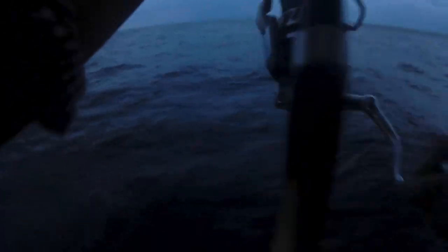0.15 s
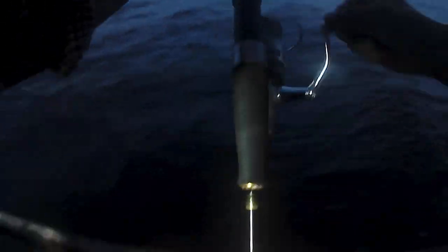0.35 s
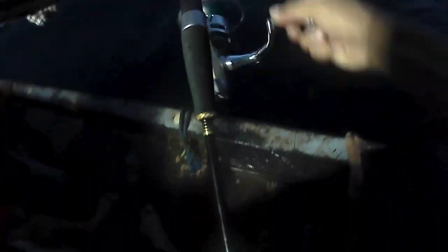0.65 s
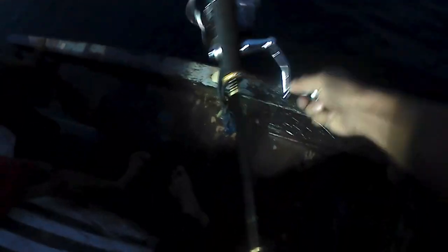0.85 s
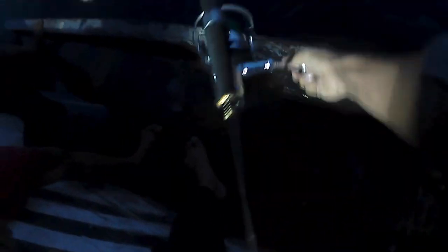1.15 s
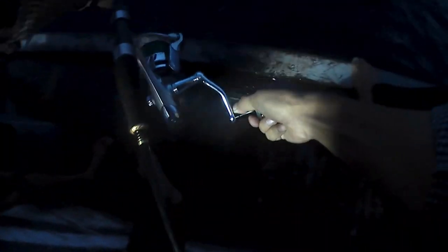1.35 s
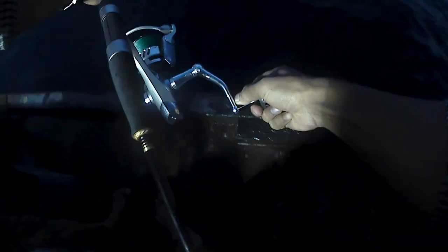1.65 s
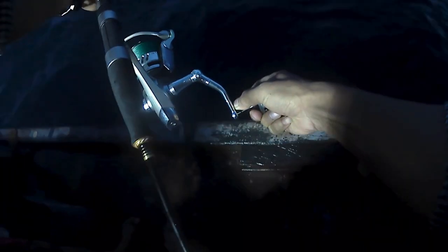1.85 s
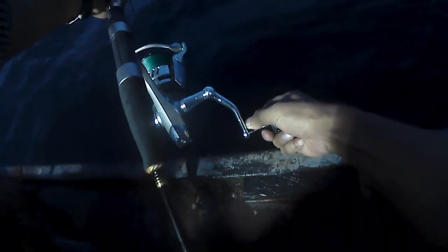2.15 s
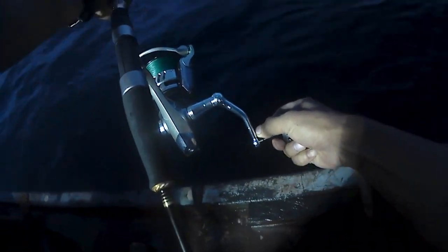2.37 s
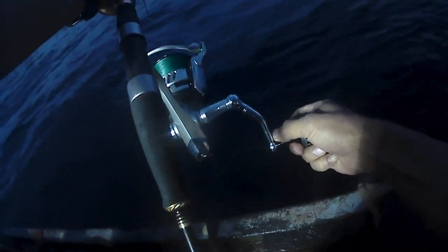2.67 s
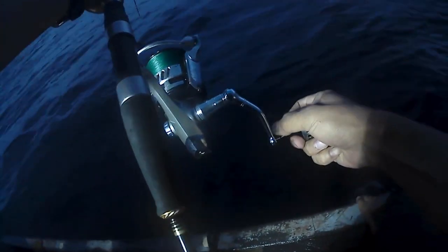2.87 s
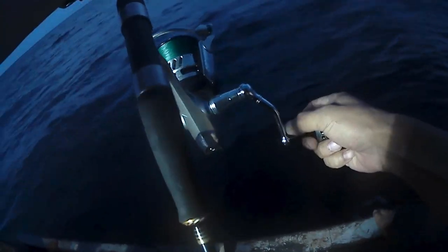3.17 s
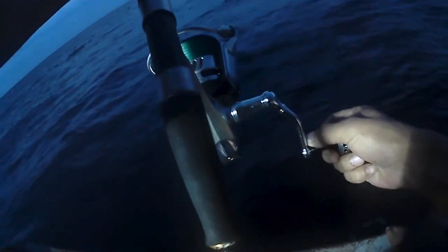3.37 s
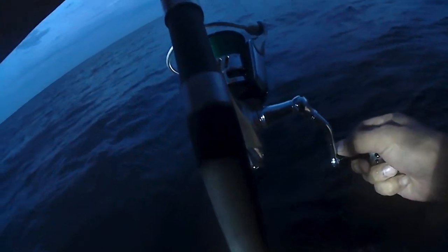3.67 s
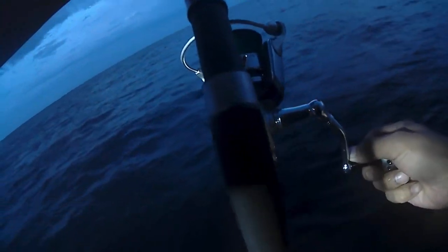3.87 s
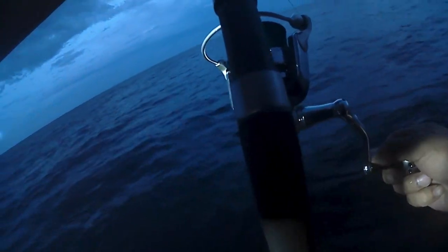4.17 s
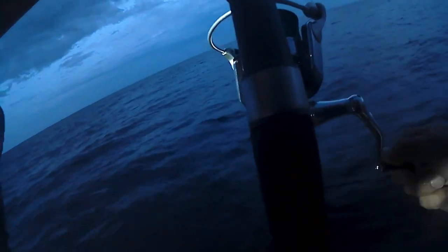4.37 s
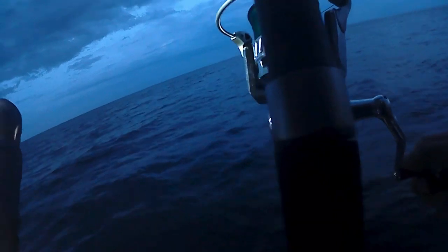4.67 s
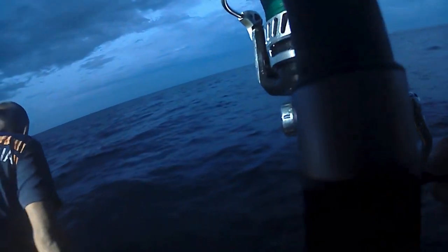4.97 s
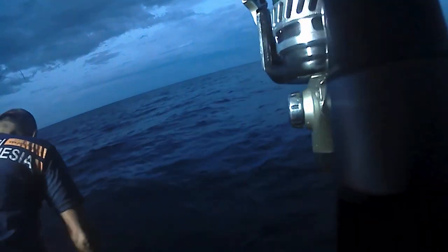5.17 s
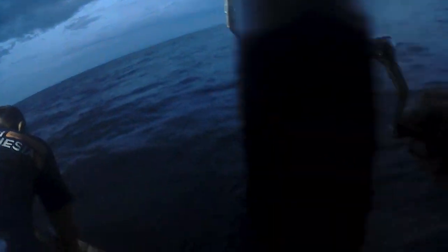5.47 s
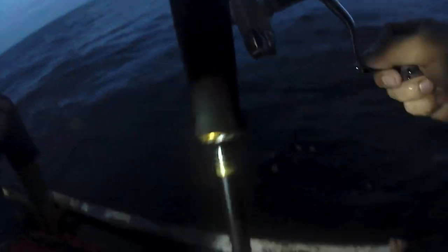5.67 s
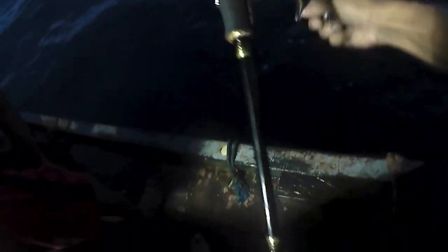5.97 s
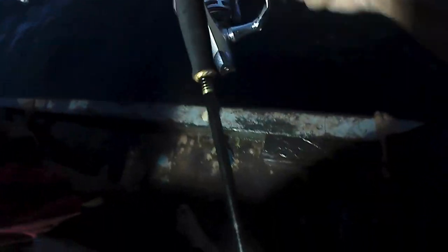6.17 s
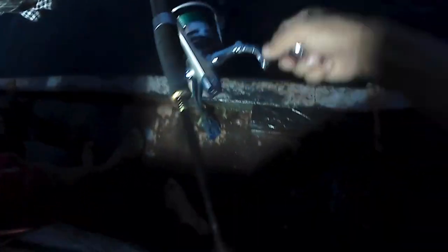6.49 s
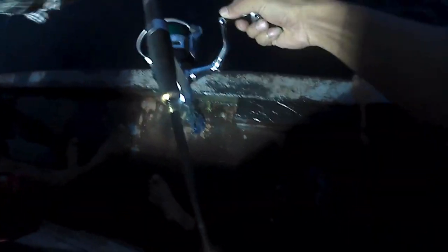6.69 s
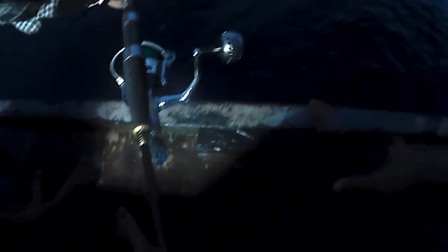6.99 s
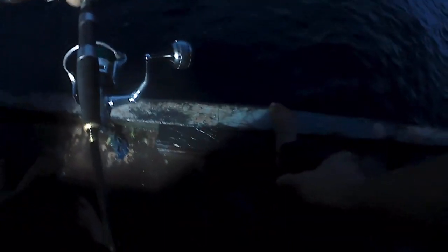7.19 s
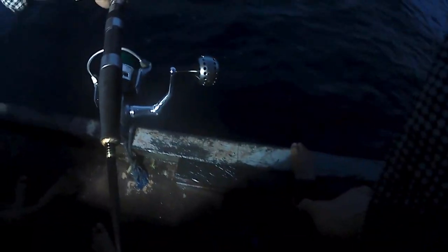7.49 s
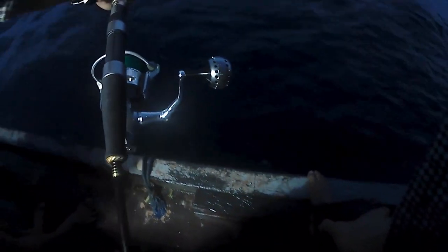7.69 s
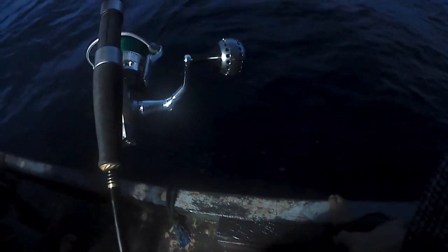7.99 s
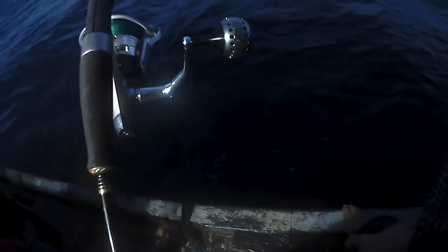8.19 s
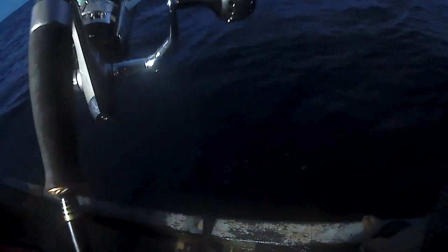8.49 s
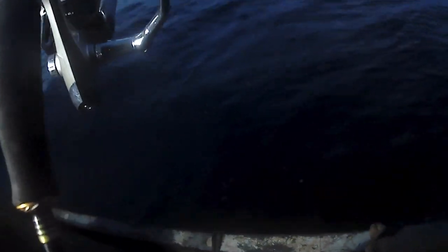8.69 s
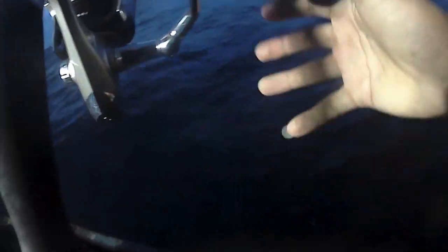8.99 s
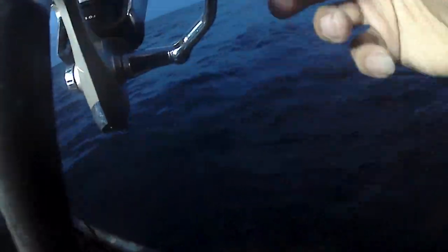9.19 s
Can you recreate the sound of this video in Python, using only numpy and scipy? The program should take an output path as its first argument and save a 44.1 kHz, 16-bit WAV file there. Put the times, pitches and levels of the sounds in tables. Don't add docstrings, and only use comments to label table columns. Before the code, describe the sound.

Muffled handling noise inside a sealed camera: cloth rubs, hard ticks and knocks, faint reel whir, low throbs, dull sea wash behind.

```python
import sys
import numpy as np
from scipy import signal
from scipy.io import wavfile
from scipy.ndimage import uniform_filter1d, minimum_filter1d

SR = 44100
rng = np.random.default_rng(int(sys.argv[2]) if len(sys.argv) > 2 else 0)


def linear_from_db(decibels):
    return 10 ** (np.asarray(decibels, float) / 20)


def wav_out(sig):
    wavfile.write(sys.argv[1], SR, np.round(np.clip(np.atleast_2d(sig).T, -1, 1) * 32767).astype(np.int16))


N = 411894
TIME = np.arange(N) / SR


def unit(x):
    return x / np.sqrt(np.mean(x ** 2))


def band(x, hz, width_hz):
    return signal.lfilter(*signal.iirpeak(hz, hz / width_hz, SR), x)


def steep_band(x, hz, width_hz):
    return band(band(x, hz, width_hz), hz, width_hz)


def ring(x, modes, sense=-1):
    return sum(sense ** k * linear_from_db(db) * band(x, hz, width_hz) for k, (hz, width_hz, db) in enumerate(modes))


def walk(rate_hz):
    hold = int(SR / rate_hz)
    steps = np.repeat(rng.standard_normal(N // hold + 1), hold)
    slewed = uniform_filter1d(uniform_filter1d(steps, hold), hold)
    return unit(slewed[:N])


def grit(rate_hz, spread_db):
    hit = rng.random(N) < rate_hz / SR
    size = rng.exponential(size=N)
    return unit(hit * rng.standard_normal(N) * linear_from_db(spread_db * size))


def around(s, reach_s):
    near = slice(max(int((s - reach_s) * SR), 0), int((s + reach_s) * SR))
    return near, TIME[near] - s


def strike(s, levels_db, response):
    push = np.zeros(N)
    push[(s * SR).astype(int)] = -linear_from_db(levels_db)
    return signal.oaconvolve(push, response / np.abs(response).max())[:N]


def curve(table):
    return np.interp(TIME, *np.transpose(table))


# frequency in Hz, density in dB per Hz.
SEA_SPECTRUM = [(18, -31), (30, 3.5), (65, -64), (106, -16), (138, -31), (173, -31.5), (353, -35.5),
                (390, -35), (489, -48.5), (530, -35), (611, -43.5), (882, -43), (3900, -53), (5070, -87),
                (8580, -120)]


def sea():
    level_db = -62
    hz_points, db_points = np.transpose(SEA_SPECTRUM)
    out, power_above = 0, 0
    swell_db = .7 * walk(1.2)
    for hz in 32 * 2 ** (np.arange(21) / 3):
        db = np.interp(np.log(hz), np.log(hz_points), db_points) + 10 * np.log10(hz)
        noise = unit(steep_band(rng.standard_normal(N), hz, hz / 3))
        out = out + linear_from_db(db + swell_db + 2.14 * walk(10)) * noise
        power_above = power_above + (hz > 340) * linear_from_db(db) ** 2
    return out * linear_from_db(level_db) / np.sqrt(power_above)


# time in seconds, rub level in dB.
CLOTH_PRESS = [(0, -60.5), (.2, -44.5), (.52, -56), (.68, -51), (1.15, -54), (1.35, -67), (2.05, -70.5),
               (2.35, -63), (4.3, -62), (5.2, -66), (5.6, -52.5), (5.9, -55), (6.35, -53.5), (6.66, -61.5),
               (6.95, -50.5), (7.7, -64), (8.25, -54.5), (9.34, -69)]
# centre in seconds, rms in dB,
# length in seconds.
STROKES = [(0.136, -44, 0.027), (0.29, -50, 0.069), (4.627, -44, 0.05), (4.718, -43, 0.088),
           (4.811, -43, 0.045), (4.888, -52, 0.049), (4.962, -50.5, 0.051), (5.034, -43.5, 0.039),
           (5.086, -48.5, 0.04), (5.173, -52.5, 0.03), (7.098, -52, 0.019), (7.173, -52, 0.037),
           (7.319, -46, 0.012), (7.503, -53.5, 0.047), (7.675, -51.5, 0.17), (8.099, -55, 0.023),
           (8.197, -56, 0.077), (8.396, -48.5, 0.022), (8.491, -49.5, 0.055), (8.562, -48, 0.076),
           (8.635, -48.5, 0.049), (9.101, -48.5, 0.031),
           (0.645, -51, 0.062), (0.792, -48.5, 0.08), (0.935, -47.5, 0.093), (1.098, -50, 0.046),
         (1.177, -53, .05), (3.488, -65.5, 0.29), (3.925, -57.5, .07), (4.115, -55.5, 0.1),
         (4.226, -52.5, .05), (4.335, -58.5, 0.092), (4.532, -56.5, 0.1), (5.675, -52.5, 0.11),
         (5.806, -53, 0.14), (6.084, -58.5, 0.29), (6.288, -49.5, 0.085), (6.445, -55, 0.082),
         (6.889, -49, 0.098), (7.03, -49, 0.13), (7.956, -60, 0.2), (8.134, -54.5, 0.15),
         (8.77, -54.5, 0.096)]
# frequency in Hz, width in Hz, level in dB.
SHELL_MODES = [(1175, 111, -3), (1383, 218, -1), (1474, 130, 2), (1602, 142, -3.5), (1846, 111, -3),
               (2405, 520, -14.5), (2637, 320, -15), (630, 100, -4.5)]
# frequency in Hz, width in Hz, level in dB.
BODY_MODES = [(203.3, 71, -3.5), (249, 34.4, 0.5), (301, 31.3, -1.5), (506, 302, -11), (631.5, 184, -8)]
# frequency in Hz, width in Hz, level in dB.
SHEEN_MODES = [(1850, 390, -6), (2756, 190, -4)]


def rub():
    quick_s = 0.062
    strokes, quick = np.zeros((2, N))
    for s, db, length_s in STROKES:
        near, u = around(s, .15)
        shape = linear_from_db(db) * np.exp(-np.abs(u / (0.45 * length_s)) ** 2.8)
        strokes[near] += shape
        quick[near] += shape / (1 + (length_s / quick_s) ** 2)
    fibres = grit(4000, spread_db=1.0)
    drag = np.hypot(linear_from_db(curve(CLOTH_PRESS) + 0.64 * walk(30)), strokes) * fibres
    wandering = [(hz, width_hz, db + 1.6 * walk(15)) for hz, width_hz, db in SHELL_MODES]
    shell, body = ring(drag, wandering), ring(drag, BODY_MODES)
    sheen = ring(quick * fibres, SHEEN_MODES)
    return linear_from_db(19.5) * shell + linear_from_db(19.5) * body + linear_from_db(11.5) * sheen


# first in seconds, end in seconds, period in seconds.
THROB_SPELLS = [
    (1.448, 5.9, .3654),
    (6.54, 8.8, .364),
]


def beats():
    return np.concatenate([np.arange(*spell) for spell in THROB_SPELLS])


# time in seconds, level in dB.
SHAKE = [(0, -45), (.15, -40.5), (.35, -41.5), (1.17, -42), (1.4, -56.5), (2.1, -60), (3.5, -50),
         (3.75, -58.5), (4.2, -45.5), (5.2, -47), (6.5, -47), (6.8, -43), (7.02, -35), (7.3, -48),
         (7.7, -47), (8.1, -48), (8.6, -42), (9.34, -60)]
# frequency in Hz, width in Hz, level in dB.
DEEP_MODES = [(55, 32.1, 0), (93.2, 44.5, 0.016)]


def buffet():
    body_db, low_db, deep_db = -7, -14.5, -2.5
    low_share, throb_shake_db = 0.43, 1
    shake_db, sway_db = curve(SHAKE), curve(SWAY)
    for s in beats():
        near, u = around(s, .2)
        shake_db[near] += throb_shake_db * np.exp(-(u / 0.2) ** 2)
    lumps = grit(700, spread_db=1.0) * linear_from_db(2.6 * walk(24))
    low, deep = (unit(ring(band(lumps, 70., 90.), [mode])) for mode in DEEP_MODES)
    body = linear_from_db(shake_db + body_db) * unit(ring(lumps, BODY_MODES))
    low = linear_from_db(low_db + shake_db + low_share * (sway_db - shake_db)) * low
    return body + low - linear_from_db(shake_db + deep_db) * deep


# time in seconds, level in dB.
SWAY = [(0.0, -63), (0.1, -26.5), (0.7, -16), (0.75, -26.5), (1.2, -20.5), (1.3, -36), (3.35, -39.5),
        (6.81, -23), (6.87, -34), (7.08, -26), (8.19, -41.5), (8.35, -30.5), (8.95, -32.5), (9.05, -61),
        (9.21, -22.5), (9.34, -42)]
# time in seconds, peak in dB.
THROB_LEVEL = [(1.4, -34.5), (2.9, -29), (3.63, -22), (4.37, -25), (5.46, -19.5), (5.83, -26), (6.9, -35),
               (7.63, -25), (8.36, -29), (8.73, -40)]
# time in seconds, peak in dB, frequency in Hz.
JOLTS = [
    (.145, -22, 24.3),
    (1.037, -24, 27),
    (1.277, -37, 22),
    (9.116, -21, 33.2),
]


def mount():
    throb_hz, octave_db = 22.15, -10
    slow = band(rng.standard_normal(N), 8.4, 8.1)
    slow = band(band(slow, 9.6, 12.3), 10.04, 13.0)
    sway = unit(slow) * linear_from_db(curve(SWAY))
    throbs = [(s, np.interp(s, *np.transpose(THROB_LEVEL)), throb_hz) for s in beats()]
    for s, db, hz in throbs + JOLTS:
        near, u = around(s, .25)
        swing = np.exp(-(u / np.where(u < 0, .03, .055)) ** 2)
        sway[near] += linear_from_db(db) * swing * np.sin(2 * np.pi * hz * u)
        sway[near] += linear_from_db(db + octave_db) * np.exp(-(u / 0.022) ** 2) * np.sin(2 * np.pi * 2 * hz * u)
    return sway


# centre in seconds, whir in dB, length in seconds.
CRANKS = [
    (0.24, -64.5, 0.38),
    (0.643, -61, 0.37),
    (0.924, -53.5, 0.091),
    (1.093, -59.5, 0.091),
    (5.732, -62.5, .35),
    (6.134, -57.5, 0.28),
    (6.459, -64, 0.12),
    (8.693, -79.5, 0.086),
]


def cranking():
    idle_db = -77
    turns = sum(linear_from_db(db) * np.exp(-((TIME - s) / (.5 * length_s)) ** 2) for s, db, length_s in CRANKS)
    return 20 * np.log10(linear_from_db(idle_db) + turns)


# frequency in Hz, width in Hz, level in dB.
REEL_MODES = [(2120, 430, 0), (2990, 80, -5), (3600, 200, -4.5), (3790, 150, -7)]


def reel():
    flutter_db = 3.5
    teeth = grit(2000, spread_db=-3.5)
    whir = 0
    for hz, width_hz, db in REEL_MODES:
        whir = whir + linear_from_db(db + flutter_db * walk(40)) * unit(steep_band(teeth, hz, 2 * width_hz))
    return linear_from_db(cranking() - 3.0) * whir


# time in seconds, tick peak in dB, deep thud in dB above the tick.
TICKS = [(0.0787, -39, -4), (0.1196, -33, 8), (0.173, -31.5, 8), (0.2238, -23, -2), (0.2595, -25.5, -2),
         (0.2904, -35.5, 4), (.4832, -40, 6.5), (0.622, -32, 6), (0.946, -35, 0.5), (2.5587, -44, -20),
         (3.9956, -44.5, -5), (4.7265, -34.5, -6), (5.8112, -44, 3), (6.437, -38, -17), (6.861, -37.5, 1.5),
         (6.9412, -32.5, 1.5), (7.0528, -39, -2), (7.5398, -42.5, 0), (8.302, -40.5, -2),
         (8.4323, -35, -17), (8.495, -27.5, -10.5), (8.534, -35.5, -13), (8.6333, -37.5, 2),
         (8.6644, -37.5, -12), (8.684, -34, -10), (8.8205, -36, -26), (8.86, -24, -4.5), (9.0117, -41, -13),
         (9.102, -28, 0), (9.206, -48, -2)]
# time in seconds, knock in dB, deep thud in dB above the knock.
BUMPS = [(0.174, -35.5, -14), (0.3412, -38, -11), (0.484, -36.5, -16), (0.578, -34, -6), (0.631, -37, -21),
         (0.87, -34, -3.5), (1.06, -40.5, -4), (1.1638, -39.5, 2), (1.2895, -40.5, 0.5), (2.359, -46.5, -7),
         (3.7713, -47, -6), (3.808, -47, 0), (4.0414, -48, 11), (4.729, -41, -15), (5.4665, -41.5, 6),
         (5.6066, -43.5, -3), (6.0436, -42.5, 7.5), (6.0889, -41.5, 6), (6.3001, -35.5, -16),
         (6.44, -43, -5), (6.5337, -47, -6), (6.638, -38, -19), (6.863, -37.5, -6), (7.06, -37, 9),
         (7.4935, -45, 5), (7.7107, -41.5, -13), (8.3842, -36, 0), (8.5657, -40.5, -2), (8.635, -45, -7),
         (8.665, -37, -9)]
# time in seconds, knock in dB.
BLOWS = [
    (0.6262, -24.5),
    (1.056, -35),
    (1.2893, -41),
    (5.025, -40),
    (7.0558, -29.5),
    (8.497, -53),
    (8.861, -56.5),
    (9.104, -46.5),
]


def taps():
    tick_knock_db, bump_tick_db = -14.5, -22.5
    edge_s = .0002
    tick_s, hard_db, hard_thud_db = np.transpose(TICKS)
    bump_s, soft_db, soft_thud_db = np.transpose(BUMPS)
    blow_s, blow_db = np.transpose(BLOWS)
    s = np.r_[tick_s, bump_s]
    u = TIME[:4000]
    click = np.exp(-((u - .0014) / 0.0011) ** 2) * np.sin(2 * np.pi * 1466.0 * u)
    tick = click + linear_from_db(-7.0) * ring(click, SHELL_MODES)
    rap = np.exp(-((u - .003) / 0.00065) ** 2)
    push = np.exp(-((u - .0025) / 0.0012) ** 2)
    knock = ring(band(rap, 280., 350.), BODY_MODES, sense=1)
    thud = ring(push, DEEP_MODES, sense=1)
    bump = np.convolve(knock, np.exp(-u[:1500] / 0.013) * rng.standard_normal(1500))
    edge = np.exp(-((u - .0015) / edge_s) ** 2)
    knock = knock + linear_from_db(-8.0) * band(edge, 640.0, 810.0)
    out = strike(s, np.r_[hard_db, soft_db + bump_tick_db] + 1.5, tick)
    out += strike(tick_s, hard_db + tick_knock_db + 7.0, knock)
    out += strike(bump_s, soft_db + 6.0, bump)
    out += strike(blow_s, blow_db + 4.5, knock)
    out += strike(s, np.r_[hard_db + hard_thud_db, soft_db + soft_thud_db] + 7.5, thud)
    return out


# centre in seconds, rms in dB, length in seconds, frequency in Hz.
GROANS = [
    (1.067, -42.5, 0.046, 285),
    (4.75, -46.5, 0.17, 266),
    (5.799, -48.5, .08, 286),
    (6.3, -47, 0.091, 210),
    (7.7, -49.5, 0.11, 312),
    (8.399, -45.5, .06, 302),
    (8.802, -49, 0.15, 310),
]


def groans():
    out, noise = np.zeros(N), rng.standard_normal(20000)
    for s, db, length_s, hz in GROANS:
        near, u = around(s, .2)
        moan = unit(steep_band(noise, hz, 40.))[:len(u)]
        out[near] += linear_from_db(db) * np.exp(-(u / (.5 * length_s)) ** 2) * moan
    return out


def scene():
    return (sea() + rub() + buffet() + mount() + reel() + taps() + groans())[None]


SAMPLE_HZ = 8000


def starve(samples, margin_db=17.5, spread_db=4., top_db=-2.5):
    hz, _, cells = signal.stft(samples, SAMPLE_HZ, nperseg=256, noverlap=192)
    power = uniform_filter1d(np.abs(cells) ** 2, size=5, axis=0)
    db = 10 * np.log10(uniform_filter1d(power, size=3, axis=1) + 1e-14)
    loud = -minimum_filter1d(-db, size=15, axis=1)
    loud = np.roll(loud, -5, axis=1)
    below = np.roll(loud, int(250 / hz[1]), axis=0)
    loud = np.maximum(loud, below - spread_db)
    usual = np.median(db, axis=1, keepdims=True)
    hz = hz[:, None]
    spare = np.minimum(db - loud + margin_db, db - usual - top_db + (3900 - hz) / 200)
    keep = np.where(hz > 1100, .05 + .95 / (1 + np.exp(-np.clip(spare, -30, 30))), 1)
    return signal.istft(cells * keep, SAMPLE_HZ, nperseg=256, noverlap=192)[1][:len(samples)]


def roll_off(x):
    return signal.sosfilt(signal.butter(12, 15780, fs=SR, output="sos"), x)


def record(dry):
    sos = signal.ellip(6, .5, 40, 3880, fs=SR, output="sos")
    sample_s = np.arange(0, N / SR, 1 / SAMPLE_HZ)
    samples = starve(np.interp(sample_s, TIME, signal.sosfilt(sos, dry[0])))
    joined = np.interp(TIME, sample_s, samples)[None]
    return roll_off(joined)


dry = scene()
out = record(dry)
wav_out(out)
```